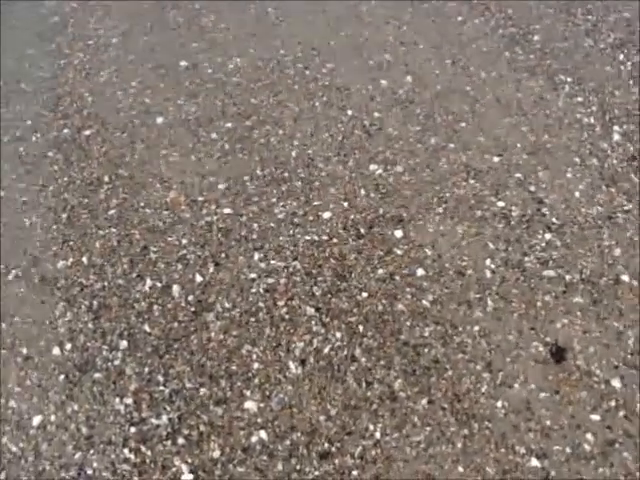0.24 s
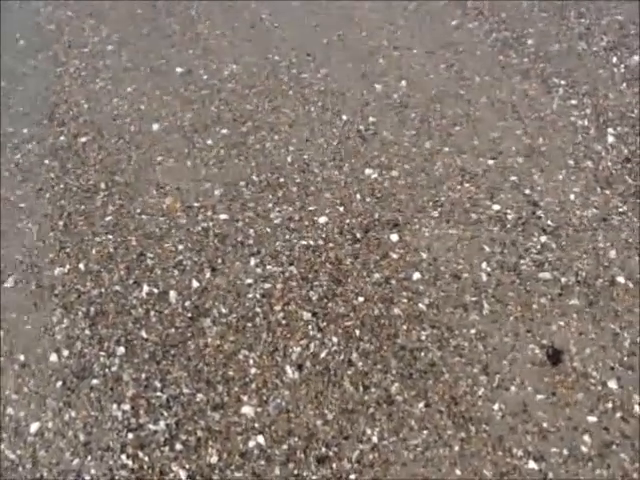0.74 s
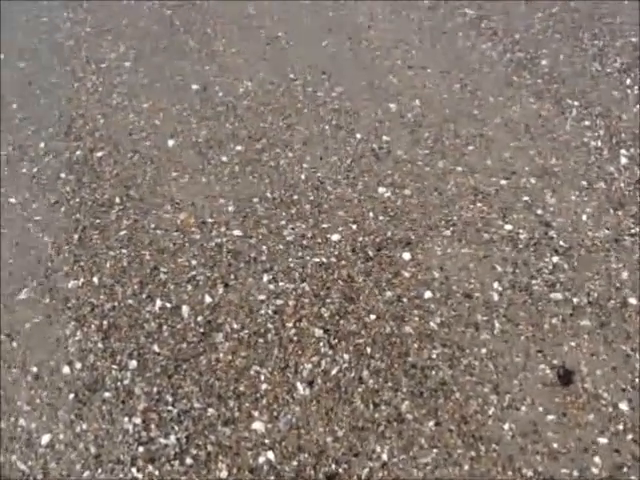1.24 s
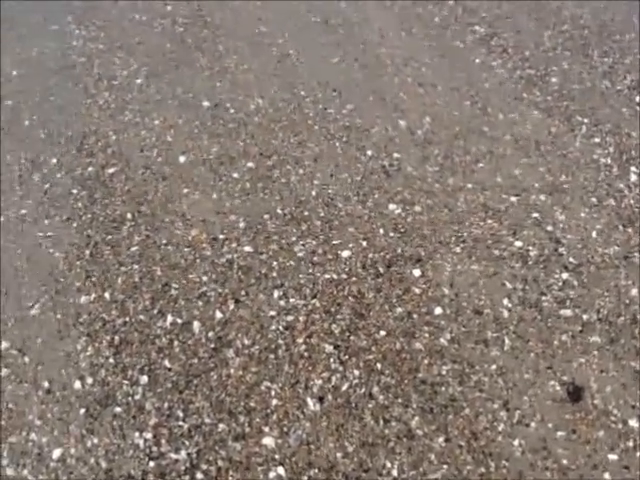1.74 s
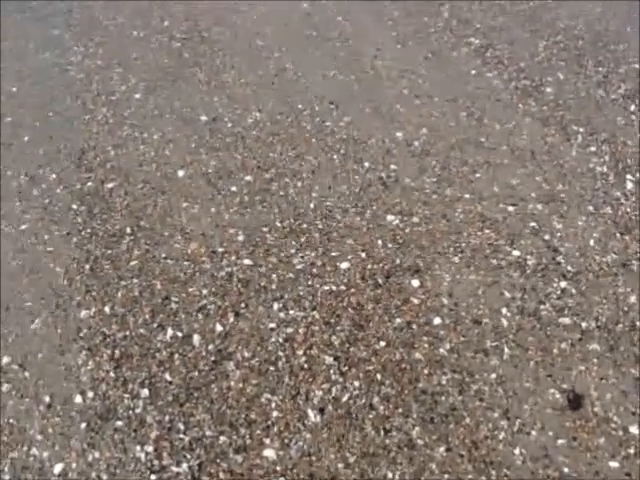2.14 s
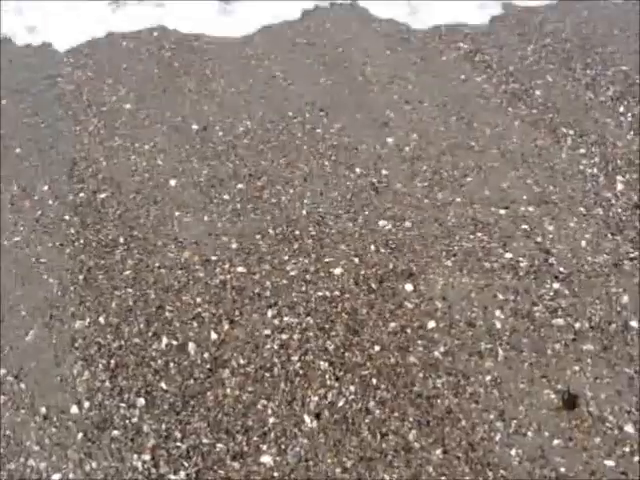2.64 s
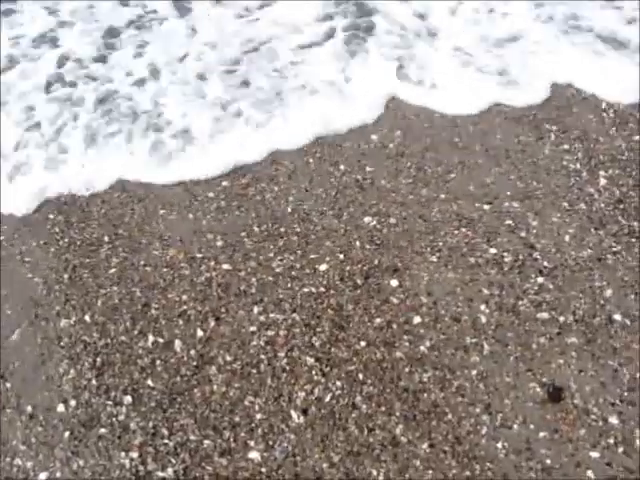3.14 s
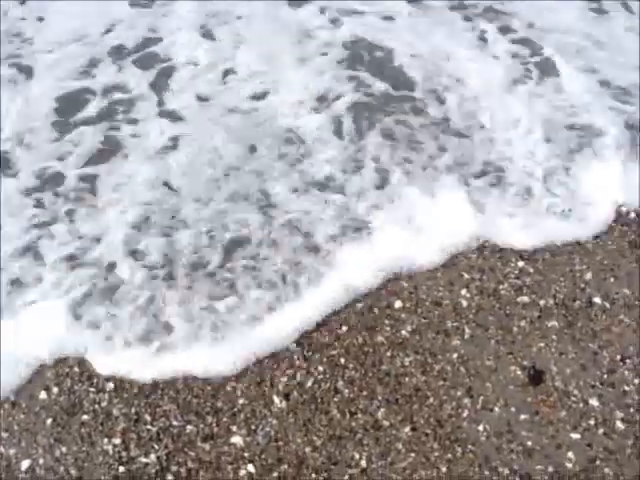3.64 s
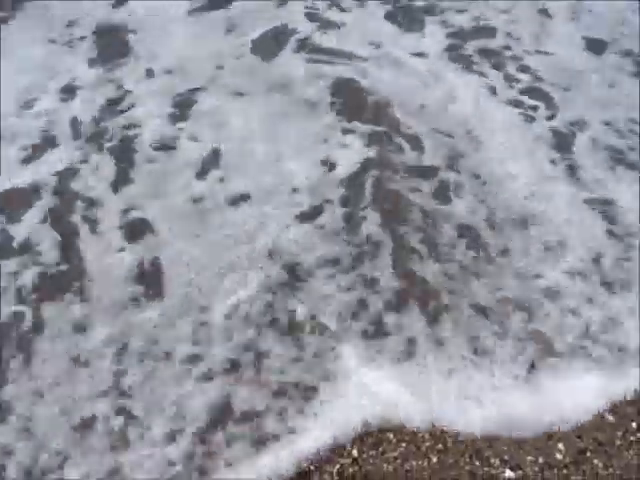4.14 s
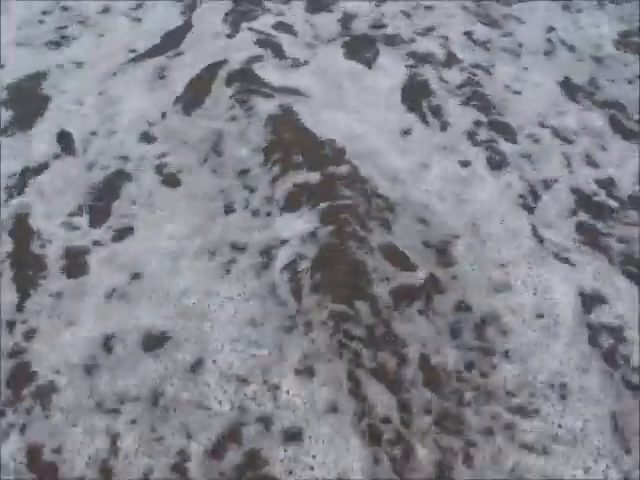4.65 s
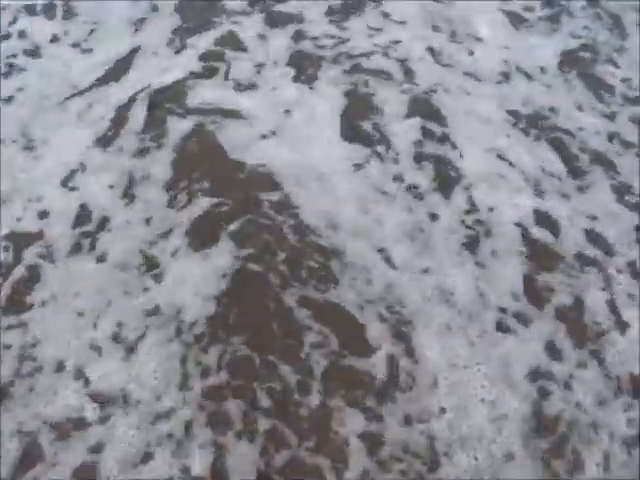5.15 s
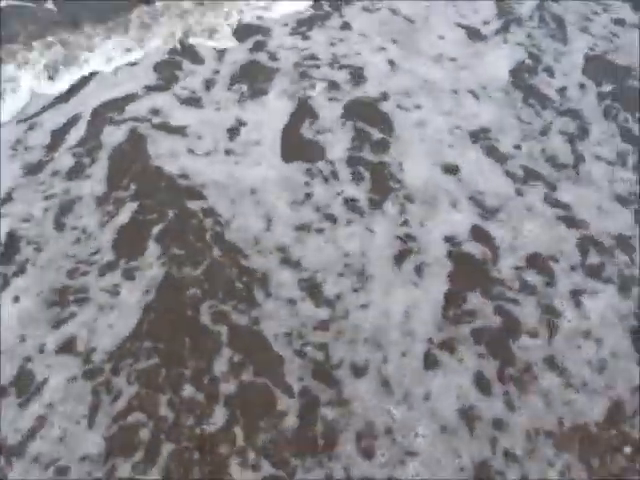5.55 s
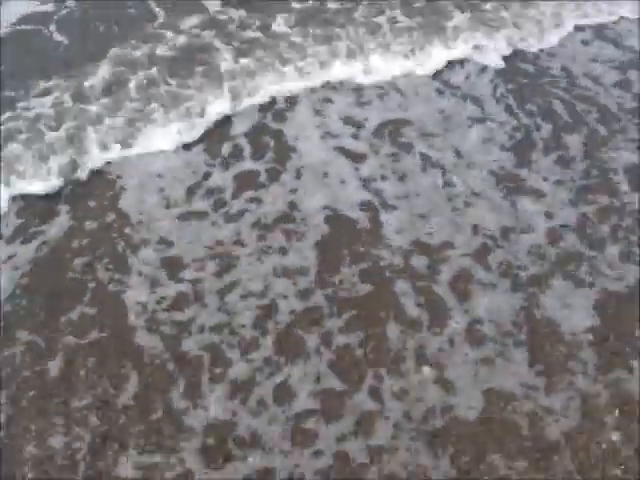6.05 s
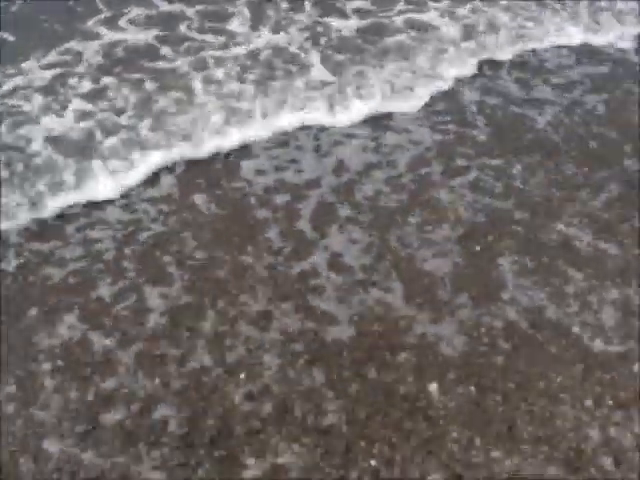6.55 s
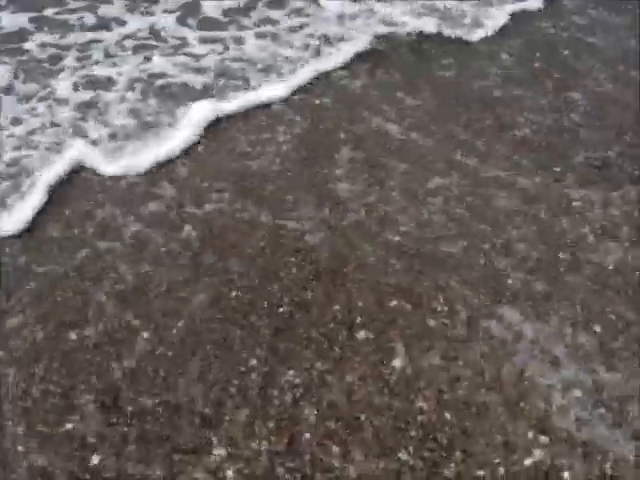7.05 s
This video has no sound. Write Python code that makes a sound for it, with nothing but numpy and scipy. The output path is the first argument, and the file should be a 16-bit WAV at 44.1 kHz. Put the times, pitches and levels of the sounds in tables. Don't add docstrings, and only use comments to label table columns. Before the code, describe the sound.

Surf on a wet shell and gravel beach, heard close through a small, dull-sounding microphone. From the start a broad wave roar is strong, peaking around 1 s, with fine foam fizz over it and light wind underneath. The roar sinks and loses brightness by 2.5 s, where a weaker wave follows. From about 2.2 s water rushes up the gravel, surging at 2.9, 3.7, 3.95 and 4.5 s, its dense bubbling rising in pitch, then ebbing by 5 s. Wind starts thumping at 2.6 s, with a cluster of low thuds near 3 s and many more from 4.6 s to the end. Foam swells again near 4.3 s; a small wave passes at 5.45 s. A bright pop snaps at 5.37 s, another at 6.7 s. Draining foam fizzes around 7 s. Brief watery warbles flicker through, mostly before 5 s; the image is almost mono.

```python
import sys
import numpy as np
from scipy import signal
from scipy.io import wavfile
from scipy.ndimage import uniform_filter1d

SR = 44100
rng = np.random.default_rng(int(sys.argv[2]) if len(sys.argv) > 2 else 0)


def volts(x):
    e = np.asarray(x, float) / 20
    return 10 ** e


def persist_wave(psi):
    counts = np.round(np.clip(psi, -1, 1) * 32767).astype(np.int16)
    wavfile.write(sys.argv[1], SR, np.atleast_2d(counts).T)


N = 321489

# crest_s, level_db, rise_s, fall_s (rise and fall each span 10 dB)
BREAKER_SWELLS = [
    (1.0, -20.5, 3.5, 2.09),
    (2.7, -29, 0.87, .6),
    (4.2, -40, 0.44, 0.44),
    (5.45, -32.5, 0.54, .6),
    (6.1, -37.5, .7, 1.08),
    (7.3, -40.5, 0.4, .5),
]
# pitch_hz, density_db (per Hz)
ROAR_SPECTRUM = [(24, -64), (40, -41), (90, -17.5), (163, -5), (294, -1.5), (530, -3.5), (744, -6.5),
                 (2310, -8), (2770, -8.5), (4460, -15.5), (6860, -11), (9000, -22), (11700, -51),
                 (19800, -120)]
# crest_s, level_db, rise_s, fall_s
FOAM_SWELLS = [
    (.6, -23.5, 2.2, 2.0),
    (1.75, -25, 0.75, 1),
    (3.3, -29, 0.83, 1.2),
    (4.3, -24.5, 0.81, 0.58),
    (5.4, -28, 1.4, 1.67),
    (6.95, -24.5, 0.82, 2.3),
]
# pitch_hz, density_db (per Hz)
FIZZ_SPECTRUM = [(900, -46.5), (1500, -33.5), (2200, -18.5), (3000, -7), (3900, -5), (5000, -5.5),
                 (6800, -2), (9000, -4.5)]
# start_s, peak_db, pitch_hz
NEAR_POPS = [
    (3.265, -17, 3600),
    (3.988, -16, 3700),
    (5.368, -10, 7600),
    (5.42, -18, 6800),
    (6.435, -17, 4250),
    (6.707, -13, 9000),
]
# time_s, level_db
WIND_LEVEL = [(0.0, -36), (0.2, -28.5), (0.45, -40.5), (1.0, -36.5), (1.5, -33.5), (2.05, -33.5),
              (2.3, -31), (2.8, -35), (3.0, -25), (3.5, -29.5), (4.2, -27.5), (4.45, -27.5), (4.7, -24),
              (5.4, -29), (6.0, -27), (6.35, -30), (6.85, -26), (7.29, -30)]
# pitch_hz, density_db (per Hz)
WIND_SPECTRUM = [(12, -31), (20, -19.5), (64, 0), (135, 0), (393, -12), (476, -17), (698, -12.5),
                 (900, -66), (1170, -67), (1980, -120)]
# centre_s, peak_db, pitch_hz
WIND_THUMPS = [(2.603, -10, 176), (2.704, -12, 158), (2.968, -11, 185), (2.984, -8.5, 191),
               (3.006, -10.5, 211), (3.035, -13, 143), (3.057, -10, 175), (3.32, -18, 115),
               (3.709, -13.5, 148), (3.812, -15, 109), (4.599, -12, 129), (4.616, -10.5, 147),
               (4.657, -11, 174), (4.822, -11.5, 134), (4.951, -13, 172), (5.244, -13.5, 147),
               (5.472, -13.5, 121), (5.534, -13, 123), (5.842, -15, 139), (5.895, -9, 139),
               (5.981, -10, 152), (6.065, -13, 141), (6.104, -12.5, 136), (6.192, -13, 132),
               (6.308, -14.5, 161), (6.417, -10, 173), (6.589, -15, 162), (6.618, -8, 162),
               (6.662, -14, 157), (6.896, -12.5, 125)]
# crest_s, level_db, rise_s, fall_s
SWASH_SURGES = [
    (2.9, -24, 0.78, 0.76),
    (3.7, -20.5, 0.47, 0.47),
    (3.95, -21, .3, 0.6),
    (4.5, -22.5, 0.56, 0.26),
    (4.8, -32, 0.25, 0.52),
]
THINNED_FIRST = [.0527, .2234, .5434, .7994, .842, .9487, .9914, 1.482, 1.546, 1.5887, 1.6527, 1.7594,
                 2.0367, 2.762, 3.8074, 4.2554, 4.5114, 4.554, 4.5967, 6.5594]
THINNED_SECOND = [.1686, .254, .4033, .638, .6593, .7873, 1.0646, 1.15, 1.1926, 1.2566, 1.4486, 1.7046,
                  1.726, 1.8753, 2.814, 3.0273, 3.198, 3.3686]
# centre_s, low_hz, high_hz, side_db
SIDE_BANDS = [
    (0.86, 6270, 7580, -3.6),
    (1.84, 7580, 8960, -2.2),
    (3.065, 6290, 9650, -4.0),
    (4.342, 6270, 7600, -0.9),
    (5.329, 4220, 5170, -0.5),
    (6.259, 5660, 7580, -2.9),
]
HOP = 941


def rms_one(x):
    return x / np.sqrt(np.mean(x ** 2) + 1e-20)


def in_time(rows):
    s, *columns = np.transpose(rows)
    return [np.interp(np.arange(N) / SR, s, column) for column in columns]


def at_hz(points, hz):
    table_hz, table_db = np.transpose(points)
    return np.interp(np.log(hz), np.log(table_hz), table_db)


def swells(rows):
    t = np.arange(N) / SR
    power = 0
    for s, db, rise, fall in rows:
        distance = (t - s) / np.where(t < s, rise, fall)
        power = power + volts(2 * (db - 10 * distance ** 2))
    return 10 * np.log10(power + 1e-9)


def drift(rate):
    r = np.exp(-80 * np.pi * rate / SR)
    noise = rng.standard_normal(N // 40 + 2002)
    slow = signal.lfilter([1], [1, -2 * r, r * r], noise)[2000:]
    return np.interp(np.arange(N) / 40, np.arange(len(slow)), rms_one(slow))


def ring(clicks, hz, cycles):
    r = volts(-60 * hz / (cycles * SR))
    w = 2 * np.pi * hz / SR
    return signal.lfilter([0, np.sin(w)], [1, -2 * r * np.cos(w), r * r], clicks + 1e-18)


def grains(per_s, spread_db):
    sizes = volts(spread_db * np.minimum(rng.exponential(1, N), 5)) * rng.choice([-1, 1], N)
    chance = per_s / SR
    return sizes * (rng.random(N) < chance) / np.sqrt(chance)


def coloured(pair, spectrum, span_hz, shared_db, own_db, own_rate, tilt=0, pivot_hz=1000):
    out, power, together = 0, 0, drift(7.4)
    edges = span_hz[0] * 2 ** np.arange(0, np.log2(span_hz[1] / span_hz[0]), 1 / 3)
    for k, (low, high) in enumerate(zip(edges, edges[1:])):
        band_pass = signal.butter(2, [low, high], "band", fs=SR, output="sos")
        band = signal.sosfilt(band_pass, pair[k % 2])
        hz = min(np.sqrt(low * high), 9000)
        band_db = at_hz(spectrum, hz)
        power += volts(2 * band_db) * (high - low) / SR
        flicker_db = shared_db * together + own_db * drift(own_rate)
        out = out + volts(band_db + tilt * np.log2(hz / pivot_hz) + flicker_db) * band
    return out / np.sqrt(power)


def breakers():
    roar_db = swells(BREAKER_SWELLS)
    full_db, dulling_per_db = -21, 0.0924
    brightness = dulling_per_db * (roar_db - full_db)
    noise = rng.standard_normal((2, N))
    roar = coloured(noise, ROAR_SPECTRUM, (40, 13000), 0.2, 0.62, 7.4, tilt=brightness)
    return volts(roar_db + 4) * roar


def foam():
    level_db = swells(FOAM_SWELLS)
    mean_db, coarser_per_db = -26.5, 0.66
    fineness = -coarser_per_db * (level_db - mean_db)
    crackle = [grains(6000, spread_db=1.5) for source in range(2)]
    fizz = coloured(crackle, FIZZ_SPECTRUM, (1000, 13000), 0.6, 0.8, 14.0, tilt=fineness, pivot_hz=5140)
    out = volts(level_db - 2) * fizz
    for s, peak_db, hz in NEAR_POPS:
        click = np.zeros(N)
        click[round(s * SR)] = volts(peak_db + 6.5)
        out += ring(click, hz, cycles=8.0)
    return out


def wind():
    level_db, = in_time(WIND_LEVEL)
    lumps = volts(0.91 * drift(25.0) + 1.5 * drift(5.0))
    noise = rng.standard_normal((2, N))
    rumble = coloured(noise, WIND_SPECTRUM, (16, 1700), 0.29, 0.6, 8.6)
    out = volts(level_db + 4.5) * rms_one(lumps * rumble)
    t = np.arange(-1200, 1200) / SR
    phases = rng.uniform(0, 2 * np.pi, len(WIND_THUMPS))
    for (s, peak_db, hz), phase in zip(WIND_THUMPS, phases):
        middle, half = round(s * SR), len(t) // 2
        near = slice(middle - half, middle + half)
        out[near] *= 1 - 0.35 * np.exp(-(t * hz / 0.53) ** 2)
        thump = np.exp(-(t * hz / 0.66) ** 2) * np.cos(2 * np.pi * hz * t + phase)
        out[near] += volts(peak_db + 0.5) * thump
    return out


def swash():
    level_db = swells(SWASH_SURGES)
    far_hz, near_hz, nears_s, run_s = 2540, 3740, 3.3, 1.3
    nearness = np.clip((np.arange(N) / SR - nears_s) / run_s, 0, 1)
    pitch_hz = far_hz + (near_hz - far_hz) * nearness
    clicks = grains(9000, spread_db=-0.5)
    bubble_size = rng.integers(0, 24, N)
    out = 0
    for k, hz in enumerate(np.geomspace(1200, 7000, 24)):
        share = np.exp(-(np.log2(hz / pitch_hz) / 0.45) ** 2)
        out = out + share * rms_one(ring(clicks * (bubble_size == k), hz, cycles=8.0))
    return volts(level_db - 7) * out


def scene():
    mono = breakers() + foam() + wind() + swash()
    return np.array([mono, mono])


def lapped(x, hop, first, change):
    n = np.arange(2 * hop) + 0.5
    k = np.arange(hop // 2) + 0.5
    basis = np.sin(np.pi * n / (2 * hop))[:, None] * np.cos(np.pi / hop * (n[:, None] + hop / 2) * k)
    basis *= np.sqrt(2 / hop)
    out = np.pad(x, (hop, 0))
    used = slice(first, first + (len(out) - first) // hop * hop)
    blocks = out[used].reshape(-1, hop).copy()
    lines = np.hstack([blocks[:-1], blocks[1:]]) @ basis
    added = (change(lines) - lines) @ basis.T
    blocks[:-1] += added[:, :hop]
    blocks[1:] += added[:, hop:]
    out[used] = blocks.ravel()
    return out[hop:]


def patch(lines, size):
    return uniform_filter1d(uniform_filter1d(lines, size[0], axis=0), size[1], axis=1)


def pinholes(lines, from_hz, under_db):
    hz = (np.arange(lines.shape[1]) + 0.5) * SR / 4 / lines.shape[1]
    power = lines ** 2
    weak = patch(power, size=(2, 3)) < volts(2 * under_db) * patch(power, size=(20, 5))
    gone = patch(1.0 * weak * (hz > from_hz), size=(2, 3)) > 1e-6
    return np.where(gone, 0, lines)


def thin_to_tones(lines, moments, first_s):
    thinned = lines.copy()
    for s in moments:
        frame = round((s - first_s) * SR / HOP)
        line = lines[frame]
        frame_db = 10 * np.log10(np.mean(line ** 2) / 2)
        kept = 14 + 1.2 * (-14 - frame_db)
        step = (uniform_filter1d(line ** 2, size=40) + 1e-12) ** 0.38
        step *= np.repeat(volts(rng.normal(0, 1.2, 16)), 30)[:len(step)]
        step[360:] *= 0.8
        best = np.argsort(np.abs(line) / step)[-int(kept):]
        thinned[frame] = 0
        thinned[frame, best] = np.sign(line[best]) * step[best]
        thinned[frame] *= volts(-0.97) * np.linalg.norm(line) / np.linalg.norm(thinned[frame])
    return thinned


def side_noise(x):
    side, window = np.zeros(N), np.hanning(2048)
    size = len(window)
    for s, low_hz, high_hz, side_db in SIDE_BANDS:
        at = round(s * SR) - size // 2
        earlier = x[at - 2 * size:at]
        band_pass = signal.butter(4, [low_hz, high_hz], "band", fs=SR, output="sos")
        band = signal.sosfilt(band_pass, earlier)
        side[at:at + size] = volts(side_db) * window * band[size:]
    return side


def band_limit(x):
    return signal.sosfilt(signal.butter(12, 10090, fs=SR, output="sos"), x)


def record(dry):
    x = signal.sosfilt(signal.butter(N=4, Wn=8600, fs=SR, output="sos"), dry[0])
    x = 1.5 * np.tanh(x / 1.5)
    x = lapped(x, 118, 0, lambda lines: pinholes(lines, from_hz=4900, under_db=-7.8))
    for moments, first_s in [(THINNED_FIRST, 0.0309), (THINNED_SECOND, 0.0188)]:
        x = lapped(x, HOP, round(first_s * SR), lambda lines: thin_to_tones(lines, moments, first_s))
    mix = x + side_noise(x) * [[1], [-1]]
    return band_limit(mix)


dry = scene()
out = record(dry)
persist_wave(out)
```